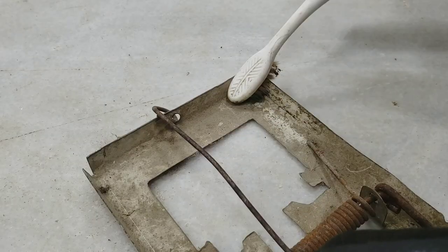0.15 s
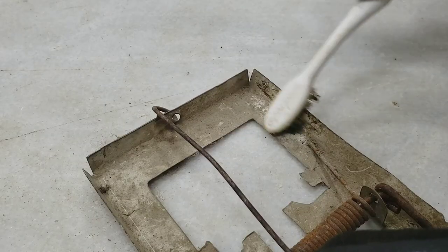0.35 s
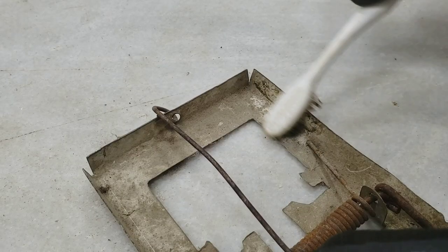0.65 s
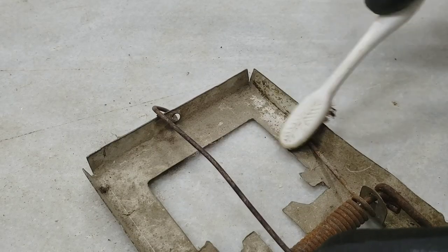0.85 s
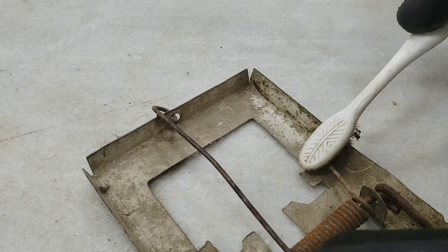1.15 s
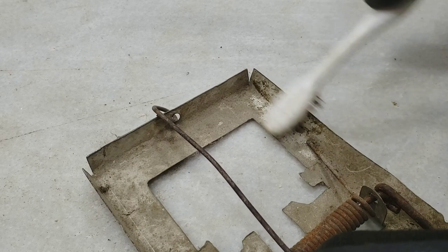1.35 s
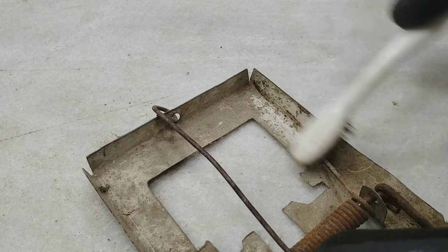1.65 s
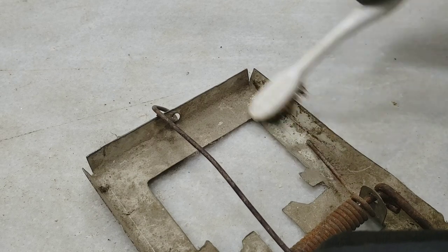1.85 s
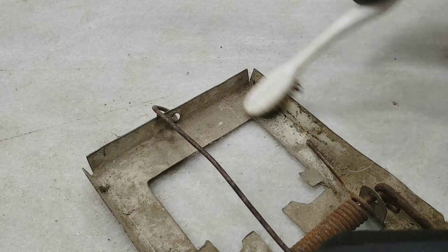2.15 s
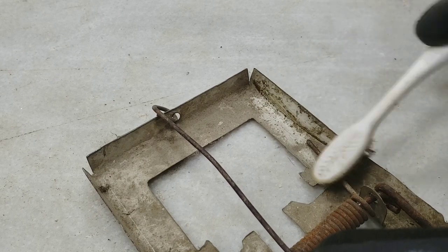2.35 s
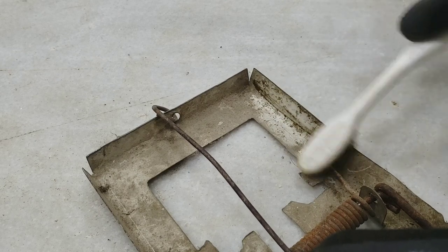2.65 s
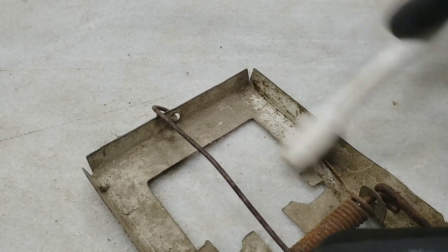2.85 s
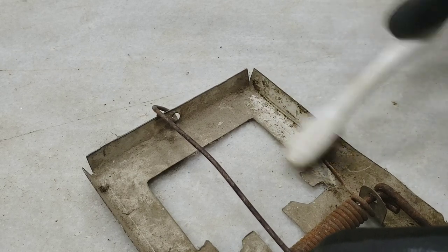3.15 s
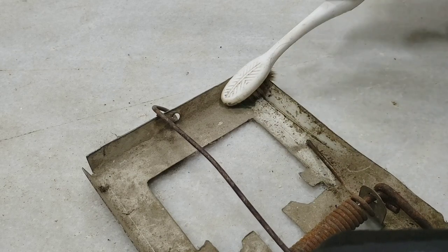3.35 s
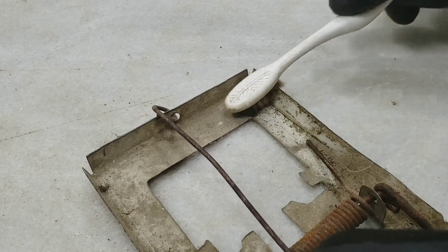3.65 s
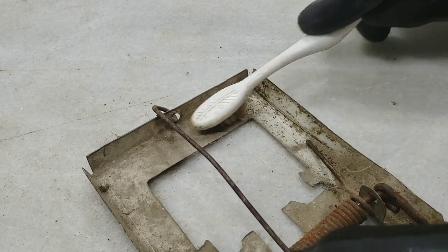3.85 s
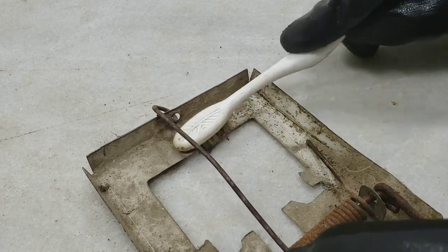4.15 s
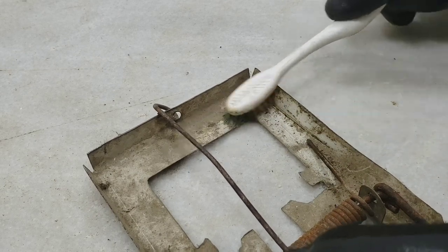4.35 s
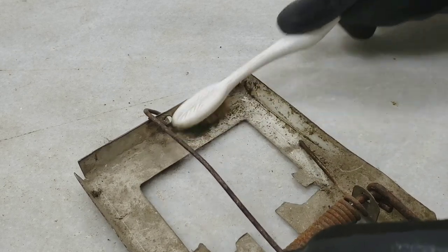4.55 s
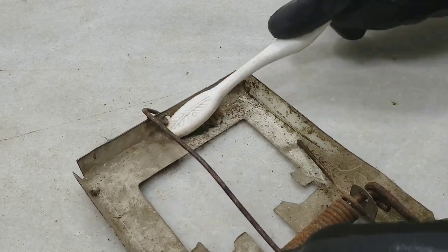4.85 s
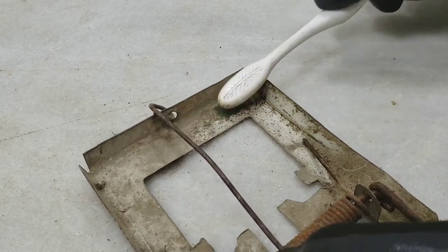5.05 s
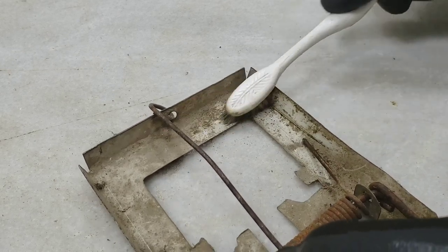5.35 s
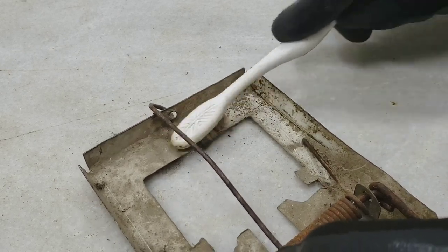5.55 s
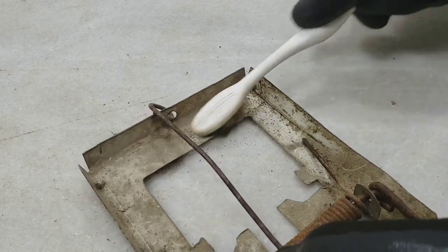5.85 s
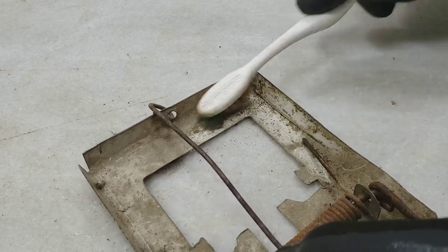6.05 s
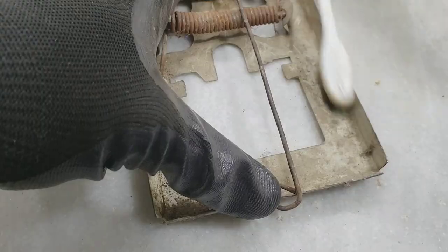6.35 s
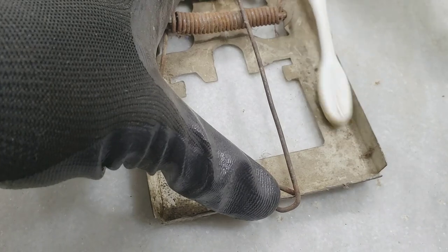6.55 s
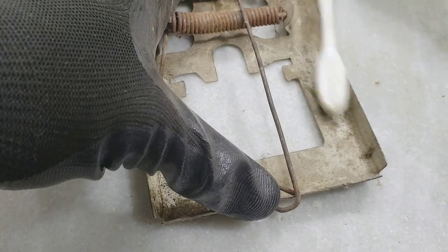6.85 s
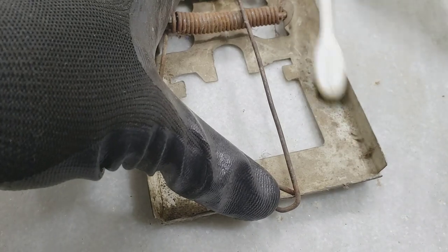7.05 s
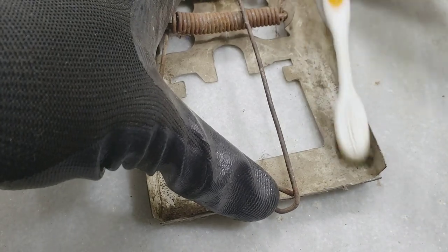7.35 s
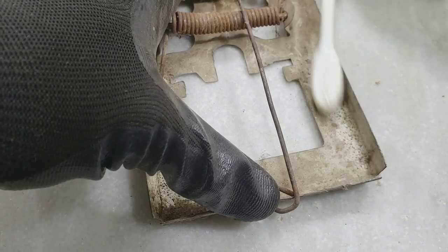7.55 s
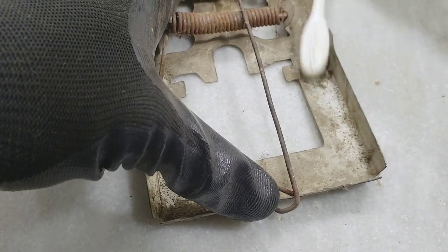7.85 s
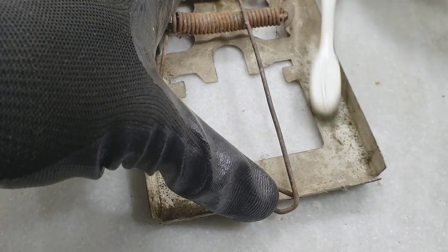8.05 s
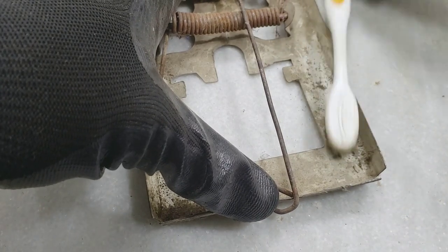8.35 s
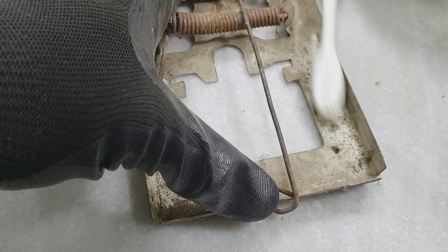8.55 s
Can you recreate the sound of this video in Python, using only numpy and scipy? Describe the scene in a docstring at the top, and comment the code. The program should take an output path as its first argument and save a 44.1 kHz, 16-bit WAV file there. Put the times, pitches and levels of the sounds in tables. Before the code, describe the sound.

A close, dry capture in a quiet small room with barely audible air and low hum. From 0 to 3.4 seconds a toothbrush scrubs rusty sheet steel quickly, about seven strokes a second; each stroke is a gritty rasp with a high ring and bright hiss. Tiny squeaks chirp near the start, at 0.3 and 0.4, and several between 2.6 and 3.3. Hard ringing clacks hit at about 0.45, 0.75, 3.05 and 3.35, and the strokes are loudest around 2.4 to 3.2. After a brief dip, from 3.5 to 6.2 the brushing is slower, softer and hissier, with a thin singing drag, smaller knocks around 4.5 to 5, light ticks and dull table bumps. From 6.2 to the end, about 8.6, the held metal rings less; steady, drier scrubbing at roughly six strokes a second continues with a knock near 6.4 and occasional soft thuds.

```python
"""A toothbrush scrubs the rusty sheet-steel frame of a spring trap, about six strokes a second.
Random bristle flicks, filtered by the frame, give scrape, a ring around 4.3 kHz and bright hiss; drags sing on.
Squeaks are wavering tones with a rasp; knocks, bumps and ticks are noise bursts through rim, frame and table.
The brush works the side rail, then the end rail of the loose trap on a cloth-covered table; then a gloved hand
holds the trap and weakens the 4.3 kHz mode. Filtered noise gives room air and hum; a short tail gives the room."""
import sys
import numpy as np
from scipy import signal
from scipy.fft import rfft, irfft
from scipy.io import wavfile
from scipy.ndimage import uniform_filter1d

SR = 44100
rng = np.random.default_rng(int(sys.argv[2]) if len(sys.argv) > 2 else 0)


def materialize(psi):
    """Save the field psi as 16-bit PCM at rate SR to the path in sys.argv[1].

    A 1-D psi becomes a single channel; in a 2-D psi each row is a channel.
    """
    bounded = np.clip(np.atleast_2d(psi).T, -1, 1)
    quanta = np.round(bounded * 32767).astype(np.int16)
    wavfile.write(sys.argv[1], SR, quanta)


N = 384552
T = np.arange(N) / SR   # s

# Brush strokes, each ending where the next begins. Each row: start in seconds, strength in dB.
STROKES = [(-0.075, -35), (0.065, -37), (0.202, -30.5), (0.347, -33.5), (0.503, -35.0), (0.641, -31.5),
           (0.781, -31), (0.925, -35.5), (1.048, -32), (1.207, -35.5), (1.343, -35.5), (1.493, -34.5),
           (1.627, -34.5), (1.771, -35), (1.928, -36.5), (2.073, -32), (2.234, -34.5), (2.383, -29),
           (2.518, -30.5), (2.664, -30), (2.812, -27), (2.952, -28), (3.104, -28), (3.24, -31.5),
           (3.405, -51), (3.6, -39), (3.855, -47.5), (4.033, -38.0), (4.201, -42.5), (4.394, -37.5),
           (4.553, -41), (4.727, -43.5), (4.92, -43.5), (5.065, -43), (5.259, -44), (5.445, -38.5),
           (5.616, -39.5), (5.797, -39), (5.98, -44.5), (6.183, -37.5), (6.305, -34), (6.48, -45),
           (6.674, -35), (6.809, -38.0), (7.008, -38), (7.175, -38.5), (7.363, -38.5), (7.54, -39.0),
           (7.716, -35.5), (7.873, -37), (8.046, -38.5), (8.216, -35), (8.383, -34.5), (8.531, -37.5)]
# Brush head on the rim. Each row: start in seconds, ring level in dB, clack level in dB re ring,
# rattle time in seconds (twice the time to its peak; the clack's is 1.64 times longer).
KNOCKS = [(0.183, -31, -5.5, 0.0045), (0.458, -14, -6.5, 0.0013), (0.7417, -15.5, -2, 0.0021),
          (3.065, -14, -3, 0.0021), (3.3594, -11.5, -2.5, 0.0011), (4.505, -24.5, -11.5, 0.0087),
          (4.617, -26.5, -9.5, 0.003), (4.762, -22, -15, 0.003), (4.8385, -22.5, -9, 0.0068),
          (4.9643, -23, -6.5, 0.0031), (5.842, -28.5, -20, 0.007), (6.022, -32.5, -8.5, 0.014),
          (6.222, -44.5, -1, .002), (6.381, -23, -11.5, 0.004), (6.935, -26.5, -12, 0.013),
          (7.337, -33.5, -5, 0.0035), (8.342, -41, 5, 0.0038)]
# Tufts catching. Each row: crest in seconds, tone level before flutter in dB, half length (sigma) in seconds.
SQUEAKS = [(0.010, -19, 0.0057), (0.021, -18.5, 0.0043), (0.268, -14, 0.0016), (0.302, -19, 0.0094),
           (0.42, -18, 0.0052), (1.128, -26.5, 0.011), (2.576, -28, 0.0033), (2.732, -24.5, 0.0062),
           (3.015, -23.5, 0.0048), (3.035, -22, 0.0053), (3.176, -21, 0.006), (3.3305, -18, 0.0032),
           (3.472, -36, 0.014), (3.92, -43, 0.008), (4.68, -35, 0.0044), (4.789, -25.5, 0.0052),
           (6.396, -29, 0.0066)]
# Frame bumping the table. Each row: start in seconds, thud level in dB, wooden knock level in dB.
BUMPS = [(0.265, -54, -46), (3.917, -54, -57.5), (4.357, -60, -57.5), (4.492, -56, -55), (4.596, -62, -51),
         (4.768, -61, -52.5), (4.838, -52, -53), (4.958, -60, -52.5), (5.082, -57.5, -65),
         (5.538, -59, -67), (5.861, -58, -80), (6.222, -59, -60), (6.37, -68, -50.5), (6.928, -71, -45.5),
         (7.336, -45.5, -57), (7.954, -54, -55.5), (8.034, -73, -50.5), (8.334, -57, -56),
         (8.419, -53.5, -72)]
# Light touches of wire and frame. Each row: start in seconds, level in dB.
TICKS = [(3.842, -61.5), (3.874, -69), (4.908, -42), (5.025, -54), (5.09, -56), (5.267, -71)]

# Frame modes: side rail, end rail, held. Each row: centre in Hz, width in Hz, rise over the broad response in dB.
SIDE_MODES = [(1680, 150, 4), (2090, 150, 3), (2790, 100, 5), (3320, 80, 5.5), (3590, 110, 4),
              (4130, 70, 6), (4298, 65, 16), (4578, 90, 12), (4680, 60, 5), (4895, 70, 5), (5710, 140, 4),
              (6090, 70, 3), (6310, 120, 4), (10880, 120, 5), (11450, 240, 2.5), (14000, 100, 4.5),
              (14780, 140, 3.5)]
END_MODES = [(565, 33, 11), (734, 260, 10.5), (1220, 43, 6.5), (1710, 230, 4.5), (2190, 56, 7.5),
             (2625, 38, 13), (3190, 61, 12), (3650, 33, 9.5), (4113, 140, 10.5), (4254, 68, 11.5),
             (4420, 81, -1), (4690, 36, 10), (5800, 75, -0.5), (10600, 180, 4), (14400, 140, 17),
             (15200, 400, 18)]
HELD_MODES = [(2140, 360, 3.9), (3514, 16, 13), (4117, 87, 7.4), (4446, 35, 5.7), (4300, 28, 1.8),
              (4730, 166, 9.8), (6230, 100, 4.8), (12300, 350, 19), (13300, 350, 2.5)]
# Table top modes. Each row: centre in Hz, width in Hz, rise over the broad response in dB.
TABLE_MODES = [(146, 8.1, 6.5), (194, 12, -7), (345, 53, 5.5), (573, 65, 9), (863, 75, 13.5)]

# Broad response of bristles on steel: side rail, end rail, held. Each row: frequency in Hz, relative gain in dB.
SIDE_SHAPE = [(300, -36.5), (700, -22), (1400, -19.5), (2400, -12), (3300, -10), (3950, -10.5),
              (4400, -3.5), (5200, -8.5), (6500, -18), (7450, -25.5), (8700, -13.5), (10800, -3.5),
              (13000, -3), (15700, -5.5)]
END_SHAPE = [(300, -34), (700, -29.5), (1400, -18.5), (2400, -16.5), (3300, -18), (3950, -20), (4400, -4.5),
             (5200, -17), (6500, -21), (7450, -29), (8700, -11), (10800, 8), (13000, 10.5), (15700, -7.5)]
HELD_SHAPE = [(300, -39), (750, -19.5), (1500, -16.5), (2700, -13.5), (3600, -11.5), (4400, -4),
              (5300, -10.5), (6450, -17), (7650, -36.5), (8600, -17.5), (10500, -8.5), (12400, -16.5),
              (13800, -4), (15700, -8)]
# Hard plastic on the rim. Each row: frequency in Hz, relative gain in dB.
CLACK_SHAPE = [(200, -12.5), (550, -22.5), (1000, -17), (1450, -7), (2200, -9), (3400, 0.5), (4400, -4),
               (5800, -1), (7600, -23.5), (9300, -12.5), (10700, -9), (12000, -10), (15700, -15.5)]
# Soft thud on the table. Each row: frequency in Hz, relative gain in dB.
THUD_SHAPE = [(25, -47), (65, 8.5), (140, -3), (260, -9.5), (500, -33), (2000, -49)]
# Dull wooden knock. Each row: frequency in Hz, relative gain in dB.
WOOD_SHAPE = [(150, -20), (400, -22), (820, -19), (1300, -17), (3000, -24), (8000, -112)]
# Steel rubbing on cloth. Each row: frequency in Hz, relative gain in dB.
CLOTH_SHAPE = [(90, -21), (190, -1), (400, -4.5), (800, -2.5), (1500, -38), (5000, -65)]
# Quiet room. Each row: frequency in Hz, relative spectral density in dB.
AIR_SHAPE = [(20, -30), (55, 6.5), (100, -4.5), (160, -5.5), (300, -12), (500, -18), (1000, -21),
             (3000, -59), (8000, -26.5), (16000, -19)]

# Bands of scrape, ring and hiss, in that order. Each row: low edge in Hz, high edge in Hz.
LAYER_BANDS = [(250, 3600), (3600, 7500), (7500, 17000)]
# Brush on side rail, end rail, held frame. Each row: moment of top speed as share of the stroke,
# its shift as share of the stroke (sign alternates by stroke), peakedness as a base exponent,
# hiss level in dB re ring, scrape level in dB re ring (both before grit).
MANNERS = [(0.52, -.02, 2.63, -0.94, -11.5), (.62, 0.044, 3.07, -3, -12), (0.56, 0.029, 2.86, -1.66, -13.5)]
# Rust under the brush, interpolated. Each row: time in seconds, extra hiss in dB, extra scrape in dB.
GRIT = [(0, -1.5, -1.5), (.42, -4, 4), (.56, -4, -2), (1.5, -1.5, -2), (1.85, 0.5, 1), (2.5, -1, -2),
        (3.3, -2, -2), (3.7, -4, -1.5), (4.8, -2.5, 1.5), (5.3, -7, -4.5), (6.1, -3.5, -3.5),
        (6.35, -1.5, -3.5), (6.9, -1.5, -3.5), (7.6, 0.5, -5), (8.7, -0.5, -5)]

END_RAIL_FROM_S, HELD_FROM_S = 3.425, 6.2
USUAL_STROKE_DB = -36
# pressing harder raises ring, scrape and hiss together, the ring slightly more
HISS_DB_PER_STROKE_DB, SCRAPE_DB_PER_STROKE_DB = 0.87, 0.95
PEAKEDNESS_DOUBLING_DB = 23   # harder strokes are more sudden
SCRAPE_LAG_S = 0.0041   # bristles bend first
FRICTION_KNEE = 0.57   # of the speed power; top speed is 1
DRAG_DB, DRAG_EXPONENT = -54.5, 0.5
# slide after a bump: crest delay, half length (sigma), level re the wooden knock
SHIFT_DELAY_S, SHIFT_HALF_S, SHIFT_DB = 0.027, 0.018, -7
AIR_DB, HUM_HZ, HUM_DB = -65, 102.2, -70.5
ROOM_T60_S, ROOM_DB = 0.12, -9.5   # level before the tail is band-limited
CUTOFF_HZ = 15850


def from_db(db):
    """Decibels to amplitude gain."""
    return 10 ** (np.asarray(db) / 20)


def rms_one(x):
    """Scale to rms 1."""
    return x / np.sqrt(np.mean(x ** 2) + 1e-20)


def drift(rate_hz):
    """Random values at rate_hz, joined by straight lines, rms 1."""
    knots = rng.standard_normal(N // 8)
    return rms_one(np.interp(T * rate_hz, np.arange(len(knots)), knots))


def response(shape, modes=(), ripple_db=0, size=8192):
    """Minimum-phase impulse response: broad spectrum, resonances, random ripple for many weak modes."""
    f_hz = np.maximum(np.arange(size // 2 + 1) * SR / size, 1)
    shape_hz, shape_db = np.transpose(shape)
    power = 1
    for centre_hz, width_hz, rise_db in modes:
        power = power + (from_db(2 * rise_db) - 1) / (1 + (2 * (f_hz - centre_hz) / width_hz) ** 2)
    ripple = ripple_db * np.interp(np.sqrt(f_hz), np.arange(200), rng.standard_normal(200))
    broad = from_db(np.interp(np.log(f_hz), np.log(shape_hz), shape_db) + ripple)
    gain = broad * np.sqrt(np.maximum(power, 1 / 10))
    # folding the cepstrum makes the response causal
    cepstrum = irfft(np.log(gain))
    cepstrum[1:size // 2] *= 2
    cepstrum[size // 2 + 1:] = 0
    return irfft(np.exp(rfft(cepstrum)))[:size // 2]


def through(x, impulse):
    """Pass a force through an impulse response."""
    return signal.oaconvolve(x, impulse)[:len(x)]


def band(x, low_hz, high_hz, order=4):
    """Butterworth band-pass."""
    return signal.sosfilt(signal.butter(order, [low_hz, high_hz], "band", fs=SR, output="sos"), x)


def add(out, start_s, sound):
    """Mix a sound in at a time."""
    at = max(round(start_s * SR), 0)
    out[at:at + len(sound)] += sound[:N - at]


def swells(rows):
    """Sum of Gaussian level swells from (crest s, dB, sigma s)."""
    return sum(from_db(db) * np.exp(-0.5 * ((T - crest_s) / half_s) ** 2) for crest_s, db, half_s in rows)


def flicks(per_s, spread_db, flutter_db):
    """Bristles snapping off grit: random signed impulses, clumped by a fluttering level as tufts let go."""
    sizes = from_db(spread_db * np.minimum(rng.exponential(1, N), 4)) * rng.choice([-1, 1], N)
    present = rng.random(N) < per_s / SR
    return sizes * present * from_db(flutter_db * drift(260))


def blow(impulse, rattle_s, snap=4.0, size=8192):
    """A contact impulse and a rattle that builds and dies, rung through a body; rms 1 over its loudest 5 ms."""
    age = np.arange(size) / (SR * max(rattle_s, 1 / SR) / 2)
    force = rng.standard_normal(size) * age * np.exp(1 - age)
    force[0] += snap
    sound = through(force, impulse)
    return sound / np.sqrt(uniform_filter1d(sound ** 2, size=220).max())


def brush_motion():
    """The brush speeds up and slows to each turn; returns speed, strength and manner at every moment."""
    start_s, strength_db = np.transpose(STROKES)
    length_s = np.diff(start_s, append=N / SR)
    k = np.maximum(np.searchsorted(start_s, T) - 1, 0)
    manner = np.searchsorted([END_RAIL_FROM_S, HELD_FROM_S], start_s + length_s / 2)
    crest, shift, peakedness, hiss_db, scrape_db = np.array(MANNERS)[manner[k]].T
    along = np.clip((T - start_s[k]) / length_s[k], 0, 1)
    top = np.clip(crest + shift * (-1) ** k, 0.1, 0.9)
    speed = np.sin(np.pi / 2 * np.minimum(along / top, (1 - along) / (1 - top)))
    return speed, strength_db[k], peakedness, hiss_db, scrape_db


def friction(speed, level_db, steepness, rest_db):
    """Friction grows with a power of speed, levels off, and keeps a floor at the turns; smoothed over 6 ms."""
    grip = np.tanh(speed ** np.abs(steepness) / FRICTION_KNEE)
    return uniform_filter1d(from_db(level_db) * (grip + from_db(rest_db)), size=260)


def brushed(force, from_s, to_s, shape, modes, count=6):
    """The brush wanders round several spots of the frame; each drives the weak modes differently."""
    during = (T >= from_s) & (T < to_s)
    place = (count * T + drift(7))[during]
    out = np.zeros(N)
    for spot in range(count):
        away = np.abs((place - spot + count / 2) % count - count / 2)
        nearness = np.maximum(1 - away, 0)
        frame = response(shape, modes, ripple_db=3.8)
        for layer, (low_hz, high_hz) in zip(force, LAYER_BANDS):
            part = band(frame, low_hz, high_hz)
            part = part / np.linalg.norm(part)
            add(out, from_s, signal.oaconvolve(layer[during] * nearness, part))
    return out


def scrubbing():
    """Friction-driven bristle flicks excite the frame in three bands: low scrape, ring, bright hiss."""
    speed, strength_db, peakedness, hiss_db, scrape_db = brush_motion()
    effort_db = strength_db - USUAL_STROKE_DB
    peakedness = peakedness * 2 ** (effort_db / PEAKEDNESS_DOUBLING_DB)
    grit_s, grit_hiss_db, grit_scrape_db = np.transpose(GRIT)
    scrape_db = scrape_db + USUAL_STROKE_DB + SCRAPE_DB_PER_STROKE_DB * effort_db
    scrape_db = scrape_db + np.interp(T, grit_s, grit_scrape_db)
    hiss_db = hiss_db + USUAL_STROKE_DB + HISS_DB_PER_STROKE_DB * effort_db
    hiss_db = hiss_db + np.interp(T, grit_s, grit_hiss_db)

    coarse = rms_one(flicks(per_s=5500, spread_db=1.0, flutter_db=1.28))
    fine = rms_one(flicks(per_s=13000, spread_db=-3.0, flutter_db=2.0))
    scrape_level = friction(speed, scrape_db, steepness=0.79 * peakedness, rest_db=-21.5)
    scrape = coarse * np.interp(T - SCRAPE_LAG_S, T, scrape_level)
    ring = coarse * friction(speed, strength_db, steepness=0.97 * peakedness, rest_db=-26.5)
    hiss = fine * friction(speed, hiss_db, steepness=1.03 * peakedness, rest_db=-26)
    force = [scrape, ring, hiss]

    side_rail = brushed(force, 0, END_RAIL_FROM_S, SIDE_SHAPE, SIDE_MODES)
    end_rail = brushed(force, END_RAIL_FROM_S, HELD_FROM_S, END_SHAPE, END_MODES)
    held = brushed(force, HELD_FROM_S, np.inf, HELD_SHAPE, HELD_MODES)
    return side_rail + end_rail + held


def room_air():
    """Quiet room noise: shaped noise with a slowly drifting level."""
    return from_db(AIR_DB + 1.5 * drift(3.7)) * rms_one(through(rng.standard_normal(N), response(AIR_SHAPE)))


def room_hum():
    """Faint hum: noise in a narrow low band."""
    return from_db(HUM_DB) * rms_one(band(rng.standard_normal(N), HUM_HZ - 5, HUM_HZ + 5, order=2))


def room_tail(x):
    """A small room returns a short, diffuse tail: decaying noise after 3 ms, band-limited."""
    t = T[:SR // 2]
    tail = rng.standard_normal(len(t)) * from_db(-60 * t / ROOM_T60_S) * (t > 0.003)
    tail /= np.linalg.norm(tail)
    return through(x, band(tail, 80, 3300, order=1))


def squeaks(pitch_hz, waver, rasp_db):
    """A tuft sticks and slips for some milliseconds: a wavering tone with a rasp around it."""
    phase = 2 * np.pi * np.cumsum(pitch_hz * (1 + waver * drift(600))) / SR
    tone = np.sqrt(2) * np.sin(phase) * from_db(3.9 * drift(500))
    snaps = flicks(per_s=9600, spread_db=2.0, flutter_db=-2.5)
    rasp = rms_one(through(snaps, response(CLACK_SHAPE, SIDE_MODES)))
    return swells(SQUEAKS) * (tone + from_db(rasp_db) * rasp)


def knocks():
    """The brush head hits the rim: a broad clack, different each time, and the main frame modes ring on."""
    out = np.zeros(N)
    loose, held = response(SIDE_SHAPE, SIDE_MODES), response(HELD_SHAPE, HELD_MODES)
    for start_s, ring_db, clack_db, rattle_s in KNOCKS:
        frame = band(loose if start_s < HELD_FROM_S else held, 4090, 4670, order=2)
        rim = band(response(CLACK_SHAPE, ripple_db=3.2), 630, 14000, order=2)
        ring = blow(frame, rattle_s, snap=3.2)
        clack = blow(rim, 1.64 * rattle_s, snap=8.3)
        add(out, start_s, from_db(ring_db) * (ring + from_db(clack_db) * clack))
    return out


def bumps():
    """The frame rocks on the cloth: a soft thud and a dull knock from the table."""
    out = np.zeros(N)
    thud_body, wood_body = response(THUD_SHAPE, TABLE_MODES), response(WOOD_SHAPE, TABLE_MODES)
    for start_s, thud_db, wood_db in BUMPS:
        thud = from_db(thud_db) * blow(thud_body, rattle_s=0.018, snap=19.0)
        wood = from_db(wood_db) * blow(wood_body, rattle_s=0.018, snap=16.0)
        add(out, start_s, thud + wood)
    return out


def shifts():
    """Each bump pushes the frame a little over the cloth; the rubbing sounds dully through the table."""
    slides = swells([(s + SHIFT_DELAY_S, wood_db + SHIFT_DB, SHIFT_HALF_S) for s, _, wood_db in BUMPS])
    rubbing = flicks(per_s=1500, spread_db=4.0, flutter_db=2.5)
    return slides * rms_one(through(rubbing, response(CLOTH_SHAPE, TABLE_MODES)))


def drags():
    """Bent bristles keep the end rail's main modes singing; they let go once per trip of two strokes."""
    trips = np.interp(T, np.transpose(STROKES)[0], np.arange(len(STROKES))) / 2
    bend = np.abs(np.sin(np.pi * trips)) * (T >= END_RAIL_FROM_S) * (T < HELD_FROM_S)
    main_modes = band(response(END_SHAPE, END_MODES), 3400, 5100, order=2)
    singing = rms_one(through(flicks(per_s=3500, spread_db=4.0, flutter_db=6.0), main_modes))
    return from_db(DRAG_DB) * bend ** DRAG_EXPONENT * singing


def ticks():
    """Loose parts of the trap touch lightly: very short blows, each with its own ripple."""
    out = np.zeros(N)
    for start_s, db in TICKS:
        body = response(CLACK_SHAPE, END_MODES, ripple_db=4.0)
        add(out, start_s, from_db(db) * blow(body, rattle_s=0.00055, snap=10.0))
    return out


def scene():
    """Brush and trap with their room tail, over faint room air and hum."""
    bristles = scrubbing() + drags() + squeaks(pitch_hz=4300, waver=0.01788, rasp_db=-12.0)
    work = bristles + knocks() + ticks() + bumps() + shifts()
    return (work + from_db(ROOM_DB) * room_tail(work) + room_air() + room_hum())[None]


def record(dry):
    """Steep elliptic low-pass."""
    return signal.sosfilt(signal.ellip(12, 0.1, 80, CUTOFF_HZ, fs=SR, output="sos"), dry)


dry = scene()
out = record(dry)
materialize(out)
```